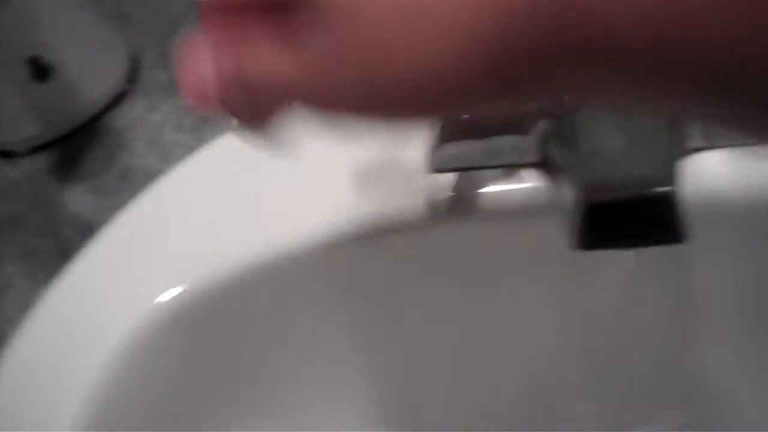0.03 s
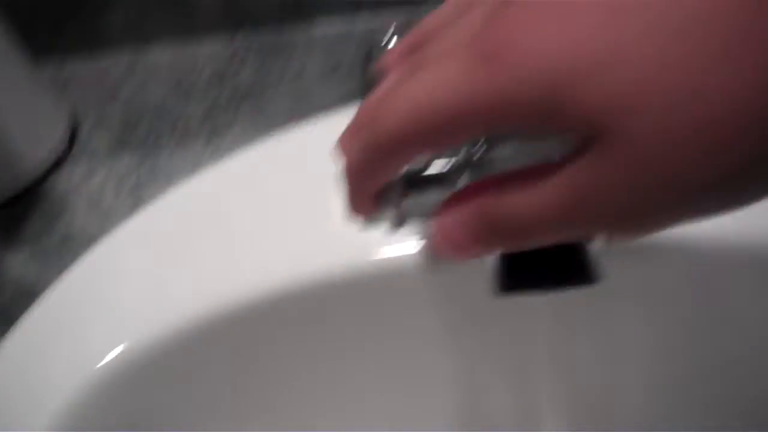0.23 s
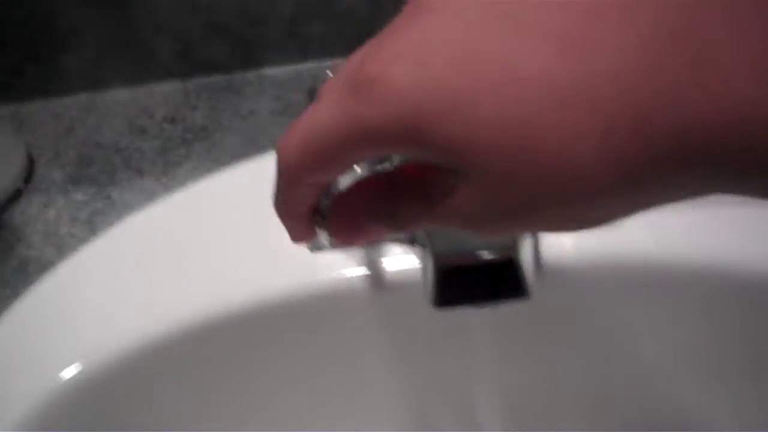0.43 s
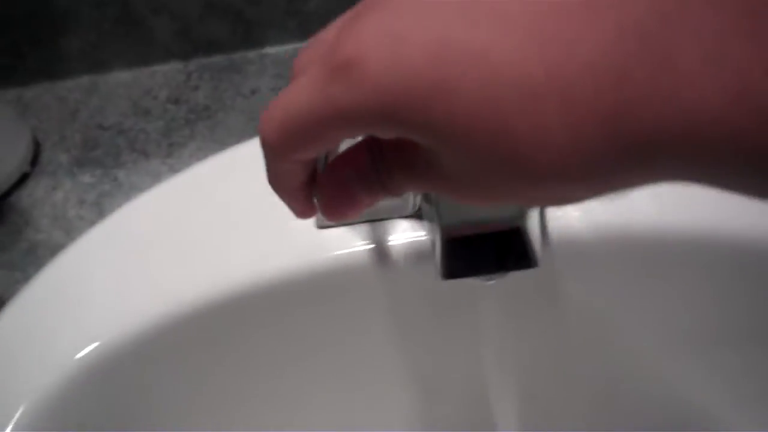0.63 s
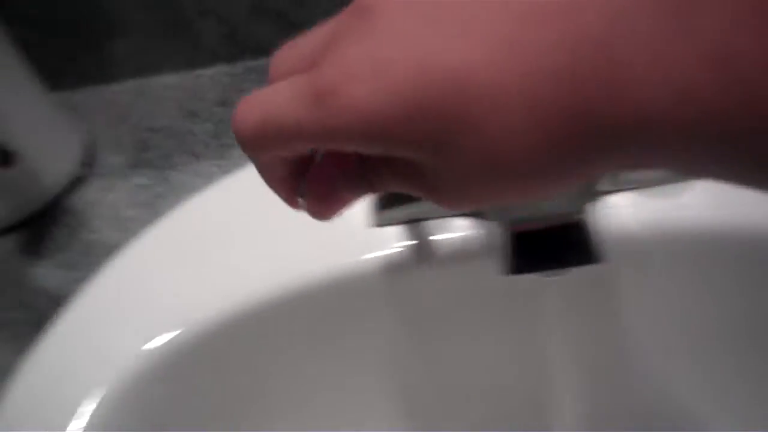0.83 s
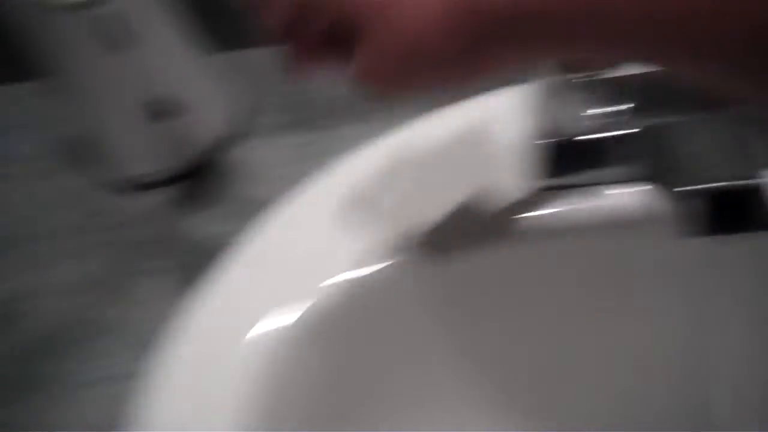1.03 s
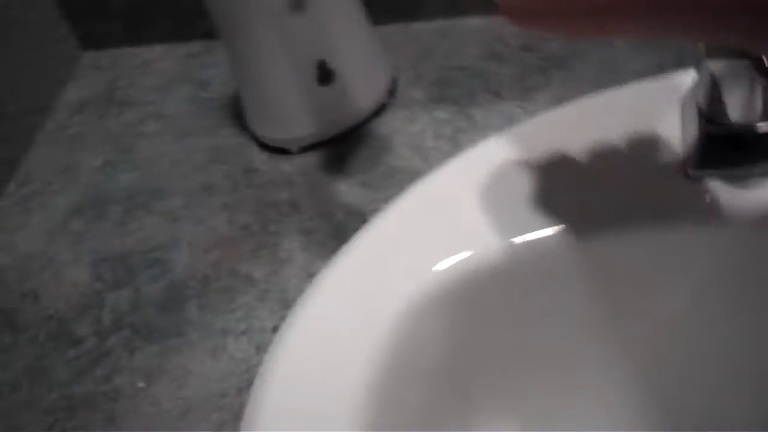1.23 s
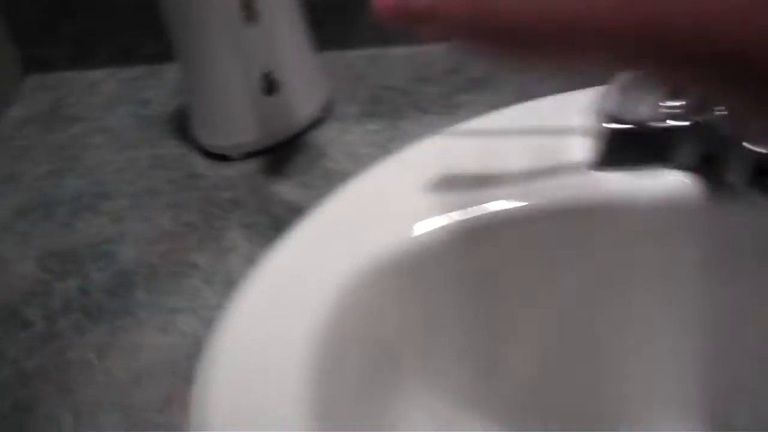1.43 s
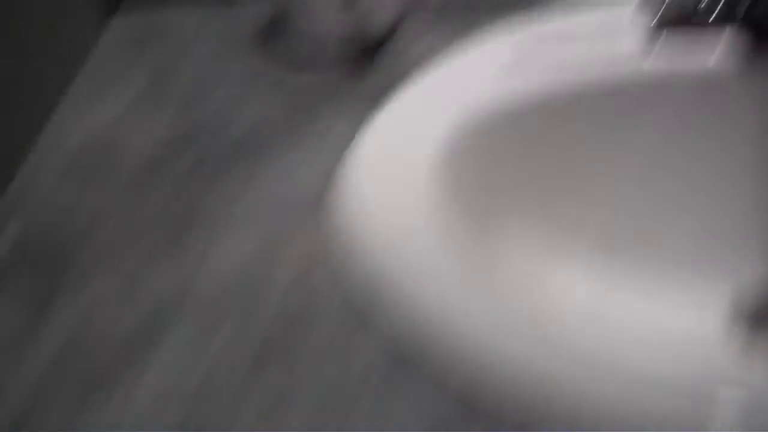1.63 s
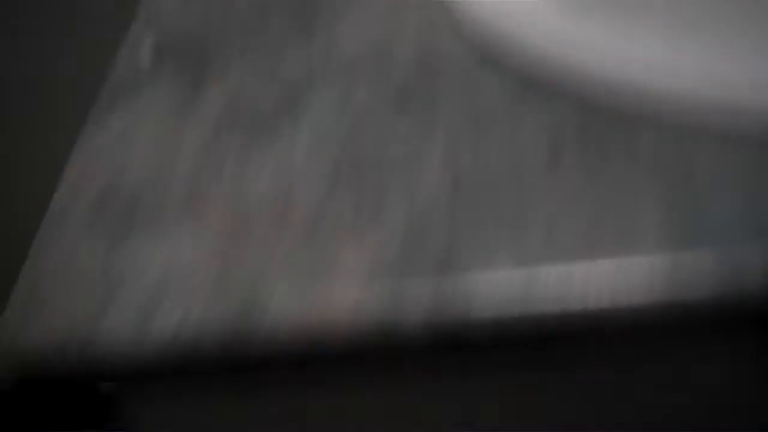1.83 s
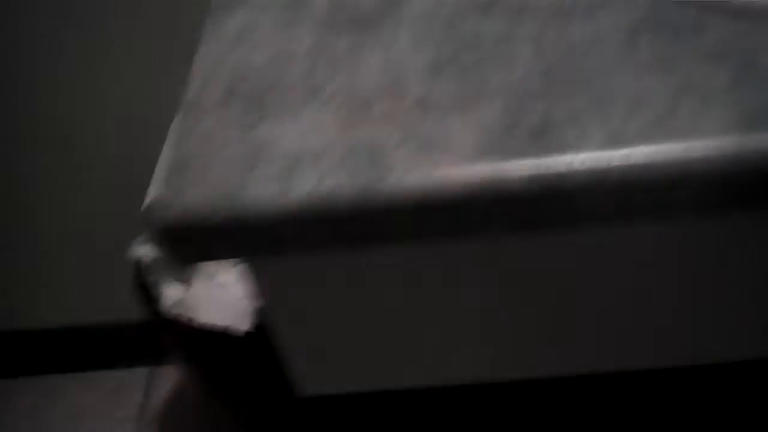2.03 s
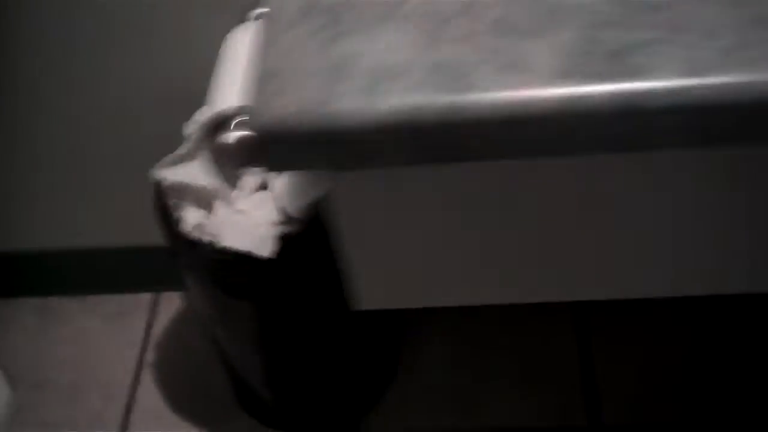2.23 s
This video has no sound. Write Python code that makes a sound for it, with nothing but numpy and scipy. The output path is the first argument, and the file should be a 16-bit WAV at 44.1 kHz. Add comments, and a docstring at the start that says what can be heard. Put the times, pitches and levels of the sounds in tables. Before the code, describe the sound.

A tap runs into a basin for about a second before its lever knocks shut.

```python
"""A small tiled bathroom, close to a ceramic basin, heard at the two microphone ports of a hand-held camera.
The tap runs for about a second: it spits, then the aerated stream hisses, spatters and drums in the bowl.
The lever knocks at its open stop and harder when shut; last drops fall and the drain gurgles faintly.
The tiles answer the drops, knocks and handling noise. Each port has its own treble resonance."""
import sys
import numpy as np
from scipy import signal
from scipy.fft import rfft, irfft, next_fast_len
from scipy.io import wavfile
from scipy.ndimage import uniform_filter1d, map_coordinates

SR = 44100
rng = np.random.default_rng(int(sys.argv[2]) if len(sys.argv) > 2 else 0)


def file_out(sig):
    """Save sig as 16-bit WAV at sys.argv[1]."""
    # one column per channel
    cols = np.atleast_2d(sig).T
    # limit, then scale
    lim = np.clip(cols, -1, 1)
    pcm = np.round(lim * 32767).astype(np.int16)
    wavfile.write(sys.argv[1], SR, pcm)


N = 101429

# room tone spectrum: f/Hz, relative level/dB
ROOM_TONE_SPECTRUM = [(25, -7), (55, -14), (85, -6), (135, 0), (190, -15), (260, -1), (350, 1.5),
                      (550, -2.5), (950, -4), (1300, -8), (2500, -12.5), (5000, -17), (7500, -19),
                      (10000, -27), (14000, -25)]
# reverberation of the tiled room: f/Hz, t60/s
ROOM_T60 = [(100, 0.68), (300, 0.76), (900, 0.37), (2200, 0.33), (7000, 0.29), (14000, 0.18)]
# likeness of left and right: f/Hz, correlation/0-1
PORT_CORRELATION = [(50, 0.79), (250, 1), (1000, .88), (2500, 0.8), (5000, 0.4), (8000, 0), (14000, 0)]
# response of the left microphone port: f/Hz, gain/dB
LEFT_PORT = [(100, 0.5), (300, 0), (4500, 0), (6000, 4.5), (7000, 10), (7800, 12), (8350, 17), (8850, 12.5),
             (10500, 5.5), (14000, 3)]
# response of the right microphone port: f/Hz, gain/dB
RIGHT_PORT = [(100, 3), (300, 2), (4500, 0), (6000, 4.5), (6800, 11.5), (7600, 12), (8300, 2), (9000, -1.5),
              (10200, 3.5), (14000, -15.5)]
# hand bumping the camera: t/s, level/dB, f/Hz, t60/s
HAND_BUMPS = [(.01, -43, 666, 0.17), (0.011, -49, 980, 0.3), (.02, -49, 107.5, 0.29),
              (1.43, -41, 182, 0.073), (1.535, -46, 90.7, 0.18), (1.544, -37.5, 286, 0.056),
              (1.607, -49, 90, .1), (1.612, -39, 957, 0.041), (1.713, -36, 1020, 0.026),
              (1.76, -40, 283.5, 0.12), (1.765, -51, 495, 0.097), (1.79, -47, 777, 0.073)]
# sleeve rustles: t/s, level/dB, half-length/s
SLEEVE_RUSTLES = [(.005, -48, 0.014), (1.804, -54, 0.011), (1.925, -52, 0.026), (2.232, -53, 0.071)]
# sleeve cloth: f/Hz, relative level/dB
CLOTH_SPECTRUM = [(200, 8), (600, 7), (1500, -4.5), (4000, 3), (8000, -8.5), (14000, -18.5)]

# last water running down the drain: t/s, level/dB
DRAIN_LEVEL = [(1.15, -40), (1.38, -37), (1.48, -48.5), (1.58, -51), (1.66, -77)]
# hollow resonances of the drain: f/Hz, relative level/dB
DRAIN_SPECTRUM = [(150, -22), (270, -3.5), (430, -4.5), (580, -11), (760, -4), (850, 3.5), (960, 3.5),
                  (1060, -21), (1500, -13.5), (4000, -12), (14000, -44)]
# larger bubbles gulped at the drain: t/s, level/dB, f/Hz, t60/s
GULPS = [(0.761, -26.5, 321.4, 0.11), (.908, -19.5, 866, .14), (0.909, -30.5, 270, 0.16)]
# stream drumming in the basin: t/s, level/dB
BASIN_LEVEL = [(.18, -50), (.26, -44), (.33, -34), (.45, -35), (.75, -33.5), (.89, -36.5), (.93, -33),
               (1.12, -35.5), (1.22, -38), (1.36, -44.5), (1.46, -52)]
# resonances of the bowl: f/Hz, relative level/dB
BOWL_SPECTRUM = [(40, -40.5), (90, -13), (170, -3), (215, -10.5), (270, 0), (430, 6), (570, -12),
                 (750, -7.5), (870, 7.5), (970, 5), (1070, 0.5), (1400, -0.5), (1600, -16.5), (2600, -12),
                 (5000, -25)]

# lever against its stops: t/s, crack level/dB, clatter level/dB, attack/s
KNOCKS = [(.3135, -30, -23.5, 0.00089), (1.2836, -6.5, -17.5, 0.00056)]
# crack of the lever: f/Hz, relative level/dB
CRACK_SPECTRUM = [(40, -31), (120, -11), (250, -13), (500, -3), (900, -22), (1250, -12), (2100, 16),
                  (2700, 3.5), (3700, -3.5), (5000, -9), (8000, -10), (14000, -42)]
# modes of the tap body: f/Hz, level on opening/dB, level on shutting/dB, t60/s
TAP_MODES = [(680, -24.5, -24.5, 0.1), (857, -42, -18, 0.12), (1458, -9.5, -18, 0.027),
             (1770, -38, -25, 0.057), (2096, -4.5, -5.5, 0.029), (2277, -29, -13, .04),
             (2660, -5.5, -2.5, 0.016), (3350, -9, -21, 0.016)]
# modes of the pipes and basin: f/Hz, level on opening/dB, level on shutting/dB, t60/s
PIPE_MODES = [(91.4, -37.5, -47, .36), (179, -29, -40.5, 0.3), (283.4, -36, -30.5, 0.4),
              (462.4, -32.5, -28.5, 0.35), (627, -24.5, -50, 0.39), (654, -26, -50, 0.38),
              (744, -33, -30.5, 0.46), (817, -32, -21, 0.28), (872, -47, -27.5, 0.2), (950, -52, -23, 0.2)]
# rattle of the counter and cabinet: f/Hz, relative level/dB
CLATTER_SPECTRUM = [(40, -27), (130, -10), (200, -28), (280, -3), (450, -8.5), (570, -8), (850, 2),
                    (1050, -6.5), (1350, -7), (1800, 1.5), (2150, -13.5), (2500, -35), (3400, -7.5),
                    (4500, -19), (14000, -44)]

# single spits and drops: t/s, snap level/dB, splash level/dB, splash t60/s
DROPS = [(0.116, -42, -34.5, 0.073), (0.21, -35, -22, 0.018), (0.4336, -9, -17, .04),
         (.4535, -11.5, -19, 0.0086), (.471, -12, -18, .015), (.562, -10.5, -19, 0.017),
         (0.7258, -13.5, -26, 0.0088), (0.8491, -10.5, -18.5, 0.024), (.902, -16, -16, 0.009),
         (.9475, -14, -20, 0.035), (1.004, -10.5, -16, 0.014), (1.035, -15.5, -29, 0.01),
         (1.206, -20, -16.5, 0.017), (1.232, -21.5, -20.5, .02), (1.265, -17, -16.5, 0.024),
         (1.2983, -22.5, -32.5, 0.0069), (1.335, -18, -21, 0.034), (1.3528, -13, -14, 0.0097),
         (1.368, -39, -24.5, 0.045), (1.394, -42, -29, 0.023), (1.42, -53, -37.5, 0.034),
         (1.536, -58, -46, 0.026)]
# splash of a drop: f/Hz, relative level/dB
SPLASH_SPECTRUM = [(300, -17), (2000, -4.5), (4500, 14.5), (6500, 7), (8000, 8.5), (10000, -2),
                   (14000, -3.5)]
# spurts of the barely open valve: t/s, level/dB
VALVE_LEVEL = [(.113, -56), (.116, -38), (.142, -57), (.16, -42.5), (.205, -42), (.215, -35), (.26, -41),
               (.31, -50)]
# song of the valve: f/Hz, relative level/dB
VALVE_SPECTRUM = [(1200, -15), (2000, -14), (2350, 3.5), (2750, -14), (3700, -2), (5500, -26), (7200, -16),
                  (8100, 2.5), (9000, -20), (14000, -22)]
# jet as the valve opens and shuts: t/s, level/dB
JET_LEVEL = [(.14, -57), (.15, -43), (.2, -41), (.215, -32.5), (.27, -23.5), (.34, -25.5), (.42, -23),
             (.48, -24.5), (.7, -26), (.9, -25), (1.0, -23.5), (1.13, -24), (1.19, -29.5), (1.28, -35.5),
             (1.34, -53), (1.4, -63), (1.47, -58)]
# hiss of the jet: f/Hz, relative level/dB
HISS_SPECTRUM = [(300, -30.5), (1200, -4.5), (1900, -9), (2400, -6.5), (2800, -1), (3400, -2.5),
                 (4600, -3.5), (5500, -3), (8000, -8.5), (14000, -8)]
# whistly edge of the aerator: f/Hz, relative level/dB
WHISTLE_SPECTRUM = [(5000, -22), (7200, -4), (8100, 5.5), (8500, -2), (9200, -16), (14000, -29)]

TOP_HZ = 14300  # band limit
SHAKE_ATTACK_S = 0.0031  # pipes and cabinet build up after a knock


def amp(db):
    """Decibels to gain."""
    return 10 ** (np.asarray(db) / 20)


def unit(x):
    """Scale to rms 1."""
    return x / np.sqrt(np.mean(x ** 2) + 1e-20)


def along(points, hz):
    """Read (f/Hz, value) points on a log frequency axis."""
    f, v = np.transpose(points)
    return np.interp(np.log(hz + 1), np.log(f + 1), v)


def level(rows):
    """Gain per sample from (t/s, level/dB) points, silent outside them."""
    s, db = np.transpose(rows)
    return amp(np.interp(np.arange(N) / SR, s, db, left=-np.inf, right=-np.inf))


def wobble(per_s):
    """A smooth random curve with per_s knots a second."""
    return map_coordinates(rng.standard_normal(N // 20), [np.arange(N) * per_s / SR])


def filtered(x, response):
    """Filter x by a function of frequency."""
    size = next_fast_len(N + SR // 2)
    return irfft(rfft(x, size) * response(np.fft.rfftfreq(size, 1 / SR)), size)[..., :N]


def minimum_phase(db):
    """Causal response with this gain, from the folded cepstrum."""
    cepstrum = irfft(np.log(amp(db)))
    half = cepstrum.shape[-1] // 2
    return np.exp(rfft(cepstrum * np.r_[1, np.full(half - 1, 2), 1, np.zeros(half - 1)]))


def spread(pair):
    """Two unrelated signals become left and right: alike in the bass, apart in the treble."""
    turn = lambda hz: np.arccos(np.clip(along(PORT_CORRELATION, hz), -1, 1)) / 2
    mid, side = filtered(pair, lambda hz: np.array([np.cos(turn(hz)), np.sin(turn(hz))]))
    return unit(np.array([mid + side, mid - side]))


def rush(spectrum, patchy_db=0):
    """Coloured stereo noise of rms 1, its gain varying in patches of time and frequency."""
    bins = signal.stft(rng.standard_normal((2, N)), nperseg=512)[2]
    patches = uniform_filter1d(rng.standard_normal(bins.shape[1:]), size=7, axis=0)
    patches = uniform_filter1d(patches, size=6, axis=1)
    pair = signal.istft(bins * amp(patchy_db * unit(patches)), nperseg=512)[1][:, :N]
    return spread(filtered(pair, lambda hz: amp(along(spectrum, hz))))


def decay(start, t60, attack):
    """Envelope of a blow: quick rise, exponential fall."""
    t = np.maximum(np.arange(N) / SR - start, 0)
    return np.exp(-np.log(1000) * t / t60) * (1 - np.exp(-t / attack))


def ring(start, hz, t60, attack):
    """One struck resonance: a damped sine."""
    return np.sin(2 * np.pi * hz * (np.arange(N) / SR - start)) * decay(start, t60, attack)


def grains(per_s, hz, octaves, q, spread_db, rise, samples):
    """A stereo shower of damped sines of random time, pitch and strength."""
    draws = rng.random((int(per_s * N / SR), 6))
    onset, pitch_a, pitch_b, rank, *phases = draws.T[:, :, None]
    pitch = np.minimum(hz * 2 ** (octaves * (pitch_a + pitch_b - 1)), TOP_HZ)
    turns = pitch * np.arange(samples) / SR
    age = turns / q
    strength = amp(-spread_db * np.log(np.maximum(rank, .01)))
    envelope = strength * np.exp(-np.pi * age) * (1 - np.exp(-2 * turns))
    at = ((onset * N).astype(int) + np.arange(samples)).ravel()
    waves = [envelope * np.sin(2 * np.pi * (turns * (1 + rise * age) + phase)) for phase in phases]
    return spread(np.array([np.bincount(at, wave.ravel(), N)[:N] for wave in waves]))


def room_tone():
    """The bathroom's low, nearly steady background with a thin hiss."""
    drift_db = .6 * wobble(9)
    return amp(-53.5 + drift_db) * rush(ROOM_TONE_SPECTRUM, patchy_db=1.2)


def room(x, wet_db):
    """Add the tiled room's answer; each frequency dies at its own speed."""
    noise = spread(rng.standard_normal((2, N)))[:, :SR // 2]
    hz, t, bins = signal.stft(noise, SR, nperseg=256)
    fade = np.exp(-np.log(1000) * t / along(ROOM_T60, hz)[:, None]) * (t > .004)
    tail = signal.istft(bins * fade, SR, nperseg=256)[1]
    return x + amp(wet_db) * signal.fftconvolve(x, tail / np.linalg.norm(tail[0]), axes=1)[:, :N]


def early_echoes(x, count=10, span_s=.012, echo_db=-11, above_hz=2500):
    """The bowl and tiles throw the treble back, with different delays at each port."""
    delays = span_s * rng.uniform(0.0994, 1, (count, 2, 1))
    gain = amp(echo_db) / np.sqrt(count)
    echoes = lambda hz: sum(np.exp(-2j * np.pi * hz * delay) for delay in delays)
    return filtered(x, lambda hz: 1 + gain * (hz > above_hz) * echoes(hz)) / np.hypot(1, amp(echo_db))


def handling(pop_s=.7982, pop_db=-5, pop_width_s=.0001, pop_gap_s=.00036):
    """Right at the microphone: soft hand bumps, sleeve rustles and a double pop in the left port."""
    t = np.arange(N) / SR
    bumps = sum(amp(db + 2.4 * wobble(180)) * ring(s, hz, t60, attack=0.0028)
                for s, db, hz, t60 in HAND_BUMPS)
    rustles = sum(amp(db) * np.exp(-((t - s) / half) ** 2) for s, db, half in SLEEVE_RUSTLES)
    sleeve = rush(CLOTH_SPECTRUM, patchy_db=-1.5) * rustles
    pop = -amp(pop_db) * sum(np.exp(-.5 * ((t - s) / pop_width_s) ** 2)
                             for s in (pop_s, pop_s + pop_gap_s))
    return room(bumps + sleeve, wet_db=-6.5) + np.array([pop, np.zeros(N)])


def drain():
    """The last water gurgles faintly through the drain's hollow resonances."""
    return level(DRAIN_LEVEL) * amp(2 * wobble(39.3)) * rush(DRAIN_SPECTRUM, patchy_db=3)


def basin():
    """The stream drums on the bowl; bubbles and a few larger gulps ring at the drain."""
    drumming = rush(BOWL_SPECTRUM, patchy_db=1.5) * amp(1.05 * wobble(50.84))
    bubbles = grains(per_s=160, hz=929, octaves=1.9, q=18.6, spread_db=2.0, rise=0.072, samples=2048)
    gulps = sum(amp(db) * ring(s, hz, t60, attack=0.0033) for s, db, hz, t60 in GULPS)
    return level(BASIN_LEVEL) * (drumming + amp(-11) * bubbles) + gulps


def clatter(start, split_hz=1040, low_t60=0.42, high_t60=0.3):
    """The counter and cabinet rattle; the treble dies first."""
    noise = rush(CLATTER_SPECTRUM)
    low = filtered(noise, lambda hz: 1 / (1 + (hz / split_hz) ** 8))
    high = noise - low
    return low * decay(start, low_t60, SHAKE_ATTACK_S) + high * decay(start, high_t60, SHAKE_ATTACK_S)


def lever():
    """Each knock cracks, rings the tap body, then shakes the pipes, the basin and the cabinet."""
    out = np.zeros((2, N))
    for knock, (s, crack_db, clatter_db, attack) in enumerate(KNOCKS):
        body = sum(amp(dbs[knock]) * ring(s, hz, t60, attack) for hz, *dbs, t60 in TAP_MODES)
        crack = amp(crack_db) * rush(CRACK_SPECTRUM) * decay(s, t60=0.043, attack=attack)
        pipes = sum(amp(dbs[knock] + 1.2 * wobble(59.5)) * ring(s, hz, t60, SHAKE_ATTACK_S)
                    for hz, *dbs, t60 in PIPE_MODES)
        out += room(body + crack, wet_db=-13) + pipes + amp(clatter_db) * clatter(s)
    return out


def snap(start, first_hz=6180, rise_hz_per_s=1180000, peak_s=0.00045):
    """A tiny bubble bursts: a few cycles of fast-rising pitch."""
    t = np.maximum(np.arange(N) / SR - start, 0)
    swell = (t / peak_s) ** 2
    turns = first_hz * t + .5 * rise_hz_per_s * t ** 2
    return swell * np.exp(1 - swell) * np.sin(2 * np.pi * turns)


def drops():
    """Spits of air and big drops, each a snap and a short bright splash."""
    splash = rush(SPLASH_SPECTRUM)
    hits = sum(amp(snap_db) * snap(s) + amp(splash_db) * splash * decay(s, t60, attack=0.0012)
               for s, snap_db, splash_db, t60 in DROPS)
    return room(hits, wet_db=-9.5)


def jet():
    """The aerated stream: fluttering, whistly hiss and fine spray; the valve sings as it opens."""
    hiss = rush(HISS_SPECTRUM, patchy_db=2.0)
    whistle = amp(-10.5) * rush(WHISTLE_SPECTRUM, patchy_db=5)
    flutter = amp(0.63 * wobble(25.24) + 1.05 * wobble(180))
    spray = grains(per_s=1300, hz=7580, octaves=0.95, q=9, spread_db=2.8, rise=0, samples=128)
    stream = early_echoes((hiss + whistle) * flutter + amp(-6.5) * spray)
    return level(JET_LEVEL) * stream + level(VALVE_LEVEL) * rush(VALVE_SPECTRUM)


def scene():
    """Everything that reaches the microphone position."""
    return jet() + basin() + drain() + drops() + lever() + handling() + room_tone()


def record(dry):
    """The camera microphone: port resonances, a slight lag on the left, clipping and the band limit."""
    size, left_lag_s = 2 * N, .00005
    hz = np.fft.rfftfreq(size, 1 / SR)
    left = minimum_phase(along(LEFT_PORT, hz)) * np.exp(-2j * np.pi * hz * left_lag_s)
    right = minimum_phase(along(RIGHT_PORT, hz))
    band = lambda f: np.clip((TOP_HZ - f) / 100, 0, 1)
    coloured = irfft(rfft(dry, size) * np.array([left, right]) * band(hz), size)[:, :N]
    return filtered(np.clip(coloured, -1, 1), band)


dry = scene()
out = record(dry)
file_out(out)
```